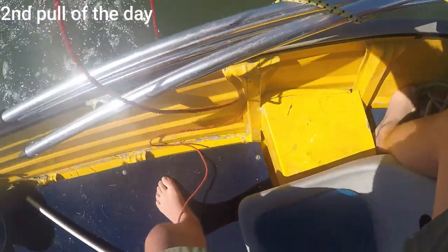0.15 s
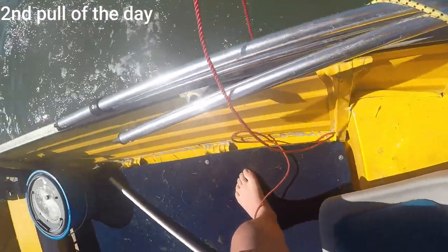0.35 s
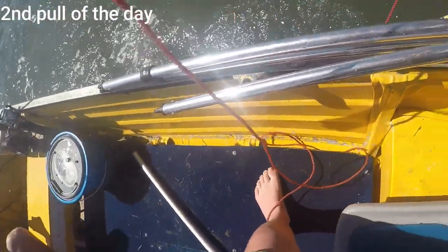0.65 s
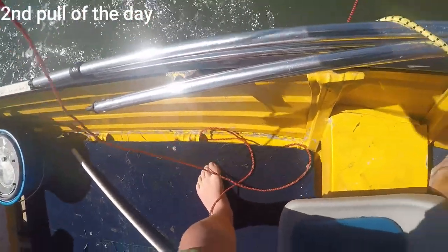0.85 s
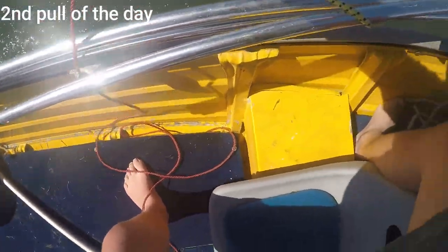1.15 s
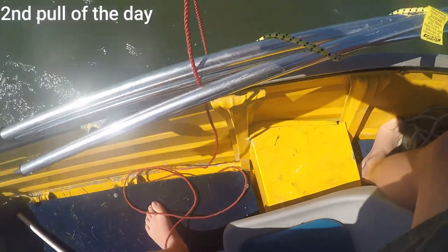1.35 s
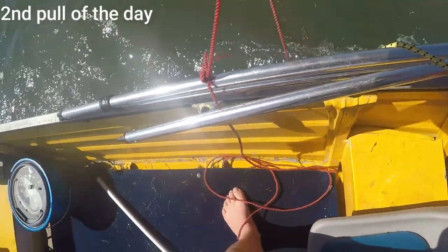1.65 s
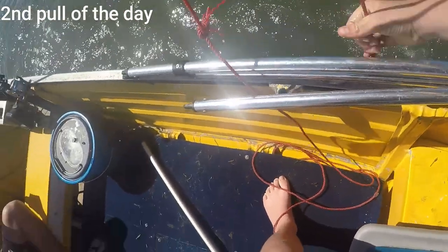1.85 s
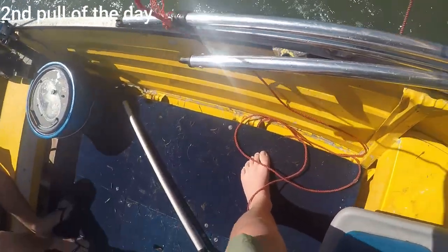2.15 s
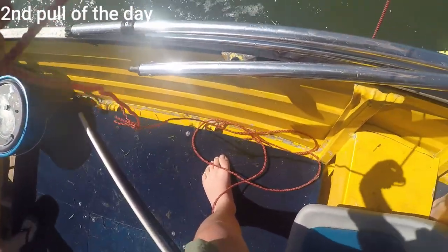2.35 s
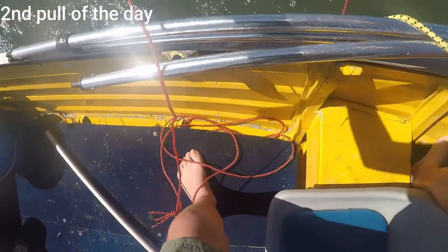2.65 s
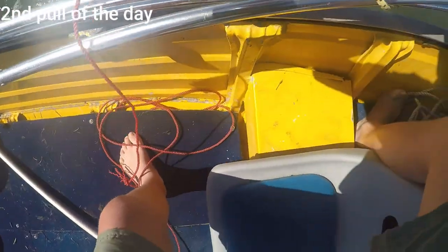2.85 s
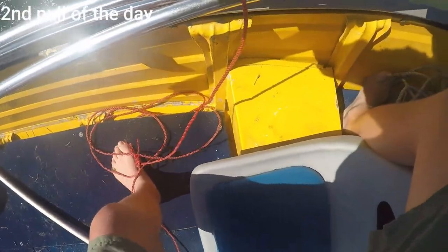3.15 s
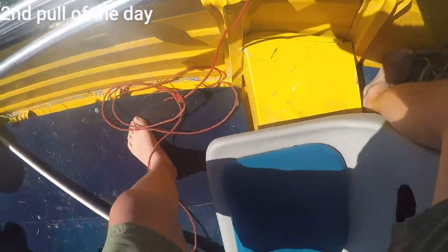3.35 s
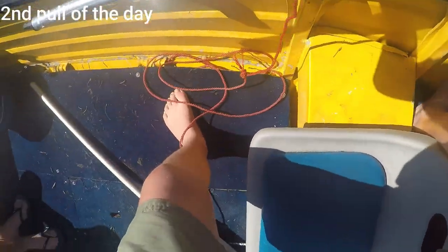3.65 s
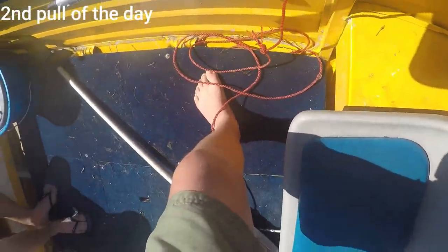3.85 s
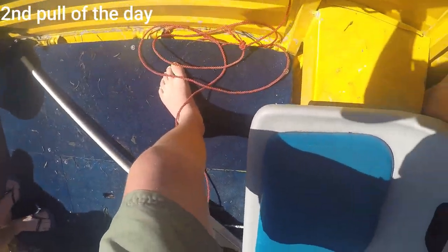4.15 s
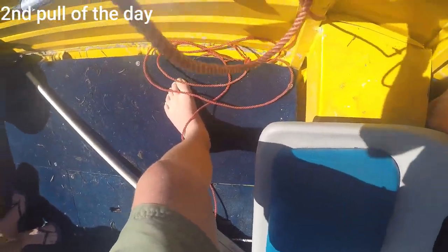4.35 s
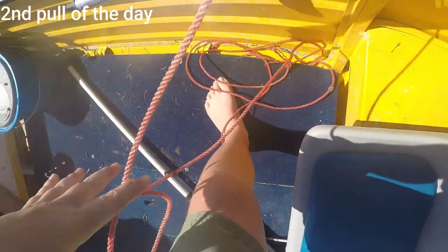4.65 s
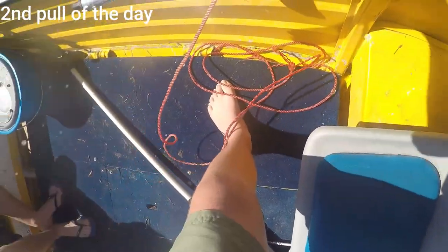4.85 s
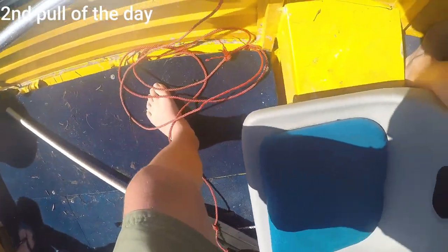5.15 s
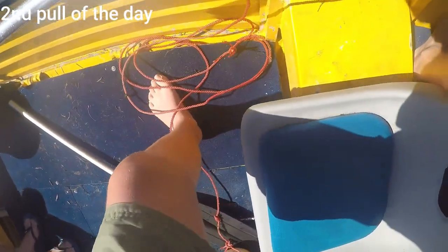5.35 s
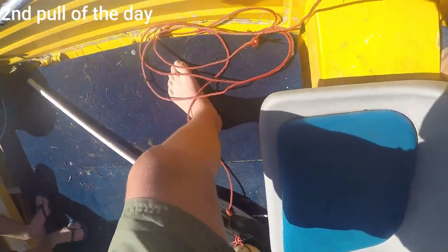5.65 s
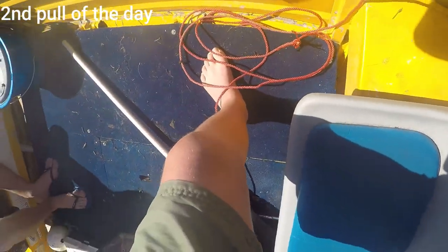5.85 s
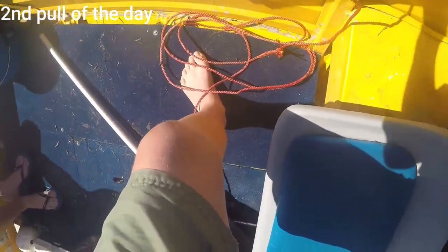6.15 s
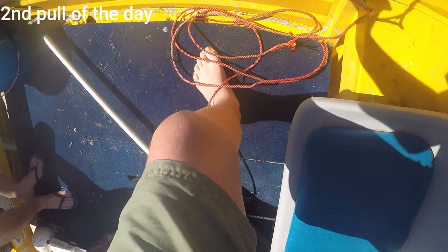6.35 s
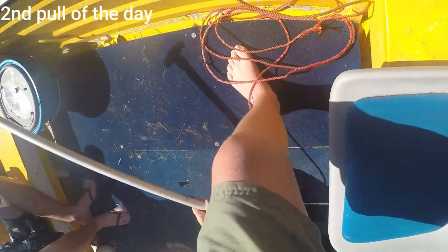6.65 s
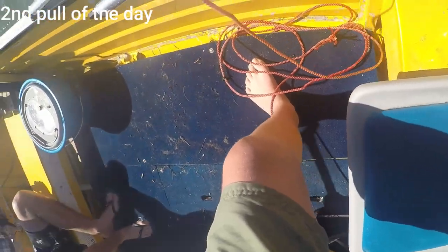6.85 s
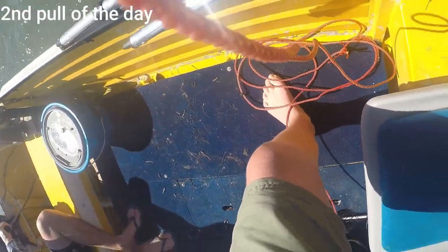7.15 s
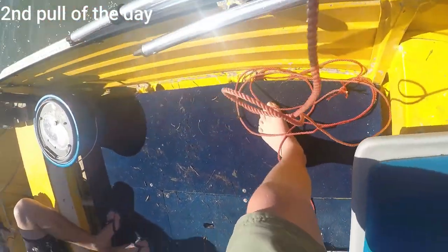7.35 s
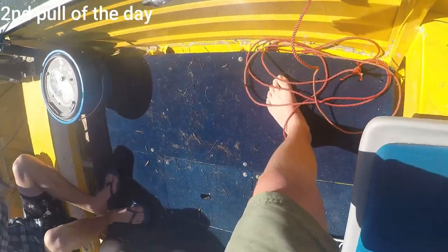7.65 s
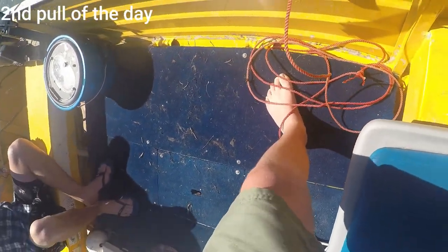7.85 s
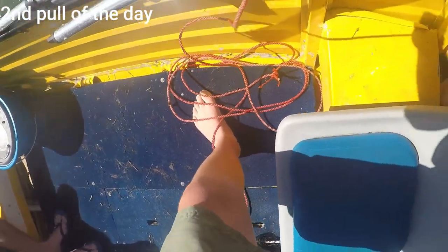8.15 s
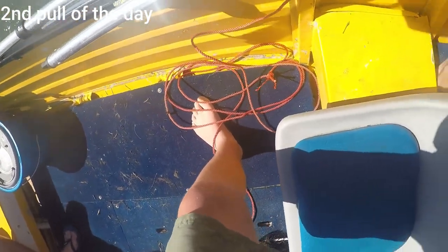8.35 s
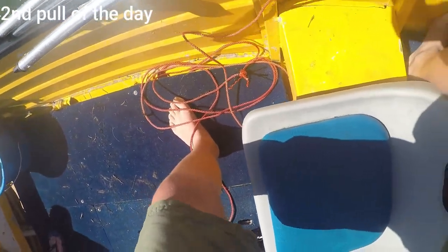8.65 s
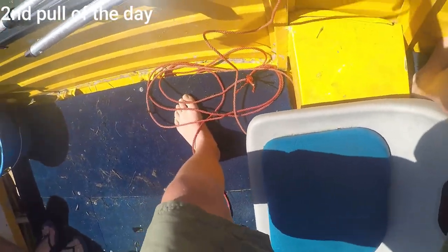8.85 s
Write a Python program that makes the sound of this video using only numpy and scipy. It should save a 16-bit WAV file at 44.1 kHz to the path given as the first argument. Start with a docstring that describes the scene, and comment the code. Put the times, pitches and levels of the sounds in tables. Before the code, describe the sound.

Outdoors in a small metal boat, heard from a body-worn microphone, wet rope is hauled in by repeated pulls, each a soft hiss with tiny splashes and a faint hull hum. Hard, short knocks on the microphone's case dominate early. A quieter middle brings dry scuffs in the hands; then knocks return, with a loud slap, rubbing and creaking as the rope hits the case. Low breeze rumble runs beneath.

```python
"""Rope hauled into a small boat

A rope is hauled hand over hand into a small aluminium boat, heard from a body-worn microphone.
Shaped noise and random clicks make the rope's hiss over the side, its scuffs in the hands and its rub on the case.
Damped modes make the knocks, slap and creak of the case and the tinkle of a small metal piece.
Slowly varying noise makes the breeze's rumble and the wash of the water."""
import sys
import numpy as np
from scipy import signal
from scipy.fft import rfft, irfft, next_fast_len
from scipy.io import wavfile
from scipy.ndimage import uniform_filter1d, minimum_filter1d

SR = 44100
rng = np.random.default_rng(int(sys.argv[2]) if len(sys.argv) > 2 else 0)


def store_wav(level_fs):
    """Save 16-bit WAV to argv[1]."""
    pcm = np.round(np.clip(np.atleast_2d(level_fs), -1, 1) * 32767)
    wavfile.write(sys.argv[1], SR, pcm.T.astype(np.int16))


N = 396459
TIME = np.arange(N) / SR
HIT = np.arange(int(.3 * SR)) / SR   # time axis of one short event, s

# lasting modes of the case: mode_hz, relative_level_db, t60_s
CASE_RING = [(1890, -19, .15), (2076, 6, 0.12), (2600, -3, 0.073), (4300, -20, .15), (4893, -4, 0.11)]


def from_db(db):
    """Decibels to gain."""
    return 10 ** (np.asarray(db) / 20)


def rms_one(x):
    """Scale to rms 1."""
    return x / np.sqrt(np.mean(x ** 2) + 1e-20)


def peak_one(x):
    """Scale to peak 1."""
    return x / np.abs(x).max()


def add(out, start_s, sound):
    """Mix a sound in at its start time."""
    i = max(int(start_s * SR), 0)
    out[i:i + len(sound)] += sound[:N - i]


def cut(x, hz, kind, order=2):
    """Butterworth low- or high-pass."""
    sos = signal.butter(order, min(hz, .45 * SR), kind, fs=SR, output="sos")
    return signal.sosfilt(sos, x)


def notch(x, hz, width_hz):
    """An antiresonance: the case hardly moves at this pitch."""
    b, a = signal.iirnotch(hz, hz / width_hz, fs=SR)
    return signal.lfilter(b, a, x)


def flutter(per_s, depth_db):
    """A gain that wanders between random values, per_s of them a second."""
    knots = rng.standard_normal(N // 10)
    return from_db(depth_db * np.interp(TIME * per_s, np.arange(len(knots)), knots))


def stroke(start_s, length_s, attack_s, release_s):
    """One movement: it eases in, holds until its length is up and dies away."""
    age = TIME - start_s
    rise = np.sin(np.pi / 2 * np.clip(age / attack_s, 0, 1)) ** 2
    return rise * np.exp(-np.clip((age - length_s) / release_s, 0, 20))


def puff(rise_s):
    """Envelope that peaks at 1 after rise_s and then dies away."""
    age = HIT / rise_s
    return age * np.exp(1 - age)


def colour(x, spectrum):
    """Give x a spectrum that falls away steeply past its ends; rms 1."""
    hz, db = np.transpose(spectrum)
    size = next_fast_len(N)
    octave = np.log2(np.fft.rfftfreq(size, 1 / SR) + 1)
    outside = np.abs(octave - np.clip(octave, np.log2(hz[0]), np.log2(hz[-1])))
    gain = from_db(np.interp(octave, np.log2(hz), db) - 20 * outside)   # 20 dB/octave outside
    return rms_one(irfft(rfft(x, size) * gain, size)[:N])


def noise(spectrum):
    """Smooth coloured noise, rms 1."""
    return colour(rng.standard_normal(N), spectrum)


def friction(spectrum, per_s, spread_db, smooth_db):
    """Fibres catch and let go in tiny clicks of uneven size, over a smooth rub."""
    heights = from_db(spread_db * np.minimum(rng.exponential(1, N), 4))
    sizes = heights * rng.choice([-1, 1], N)
    clicks = rms_one(sizes * (rng.random(N) < per_s / SR))
    return colour(clicks + from_db(smooth_db) * rng.standard_normal(N), spectrum)


def strike(modes, detune):
    """One blow rings every mode, with a strength and tuning that depend a little on where it lands."""
    hz, db, t60_s = np.transpose(modes)[:, :, None]
    level_chance, tuning_chance = rng.standard_normal((2, len(modes), 1))
    height = from_db(db + level_chance - 60 * HIT / t60_s)
    return np.sum(height * np.sin(2 * np.pi * hz * (1 + detune * tuning_chance) * HIT), axis=0)


def roughen(x, length_s, share):
    """A rough contact: the first touch is followed by a brief spray of smaller ones."""
    age = HIT[:SR // 50] / length_s
    touches = rng.standard_normal(len(age)) * age * np.exp(-age)
    touches *= share / np.linalg.norm(touches)
    touches[0] += 1
    return signal.fftconvolve(x, touches)[:len(x)]


def disperse(x, hz, count):
    """Bending waves carry the treble faster than the lows: a chain of allpasses."""
    k = np.tan(np.pi * hz / SR)
    a = (k - 1) / (k + 1)
    return signal.sosfilt([[a, 1, 0, 1, a, 0]] * count, x)


def air():
    """Open air: faint white noise."""
    return from_db(-83) * rng.standard_normal(N)


def breeze(hull):
    """Gusts and the swing of each pull buffet the microphone; slow eddies rumble underneath."""
    # breeze strength: time_s, strength_db
    wind = [(0.0, -36), (0.37, -37.5), (0.82, -50.5), (1.35, -43.5), (1.58, -34), (2.05, -55), (2.38, -54),
            (2.8, -45), (2.98, -41), (3.53, -43), (3.78, -53.5), (3.98, -54.5), (4.28, -49), (4.66, -56.5),
            (5.31, -54), (5.53, -50.5), (6.21, -52.5), (6.36, -58), (6.61, -52), (6.79, -47), (7.18, -49.5),
            (7.41, -57.5), (7.79, -59), (8.06, -50), (8.79, -57.5), (8.99, -51.5)]
    # slow eddies: freq_hz, relative_density_db_per_hz
    rumble_spectrum = [(15, -6.5), (28, -2.5), (45, -2), (65, -8), (100, -25), (200, -38)]
    # buffeting: freq_hz, relative_density_db_per_hz
    buffet_spectrum = [(50, -24), (85, 0), (115, 1), (160, -8), (220, -21), (350, -27), (600, -36)]
    usual_wind_db, rumble_db, buffet_db = -49.5, -38, -48.5   # last two: in a breeze of the usual strength
    rumble_growth = 0.71   # dB per dB: rumble grows more slowly than buffeting
    sway_db = 3.5   # buffeting by each pull's swing, relative to the hull gain
    time_s, strength_db = np.transpose(wind)
    gust = from_db(np.interp(TIME, time_s, strength_db) - usual_wind_db)
    buffet = np.hypot(from_db(buffet_db) * gust, from_db(sway_db) * hull)
    slow = noise(rumble_spectrum) * flutter(per_s=9, depth_db=2.5)
    fast = noise(buffet_spectrum) * flutter(per_s=14, depth_db=2.0)
    return from_db(rumble_db) * gust ** rumble_growth * slow + buffet * fast


def tinks():
    """A small metal piece clicks and rings on one high note."""
    # contacts: start_s, relative_level_db
    contacts = [(0.3184, -56), (1.0465, -52), (1.6444, -54), (2.6853, -47.5), (2.7375, -42.5), (4.174, -56),
                (4.844, -49.5), (6.537, -48), (7.5018, -43), (8.3659, -53), (8.3994, -32)]
    # modes of the click: mode_hz, relative_level_db, t60_s
    click_modes = [(1950, -5, 0.047), (3660, 9.5, 0.013), (5260, -5, 0.011), (7500, 6, 0.033),
                   (8070, -2.5, 0.025), (10900, -24, .012), (13400, -22, 0.0057)]
    note_hz, note_t60_s = 7340, 0.15
    note_db, note_growth = -25, 0.74   # note at a 0 dB contact; its rise, dB per dB
    out = np.zeros(N)
    note = np.sin(2 * np.pi * note_hz * HIT) * from_db(-60 * HIT / note_t60_s)
    for start_s, db in contacts:
        click = roughen(strike(click_modes, detune=0.017), length_s=0.0013, share=1.0)
        click = peak_one(disperse(click, 5340, count=6))
        add(out, start_s, from_db(db - 0.5) * click + from_db(note_db + note_growth * db) * note)
    return out


def groans():
    """The case groans briefly as it shifts on its mount: an unsteady tone with a weak octave."""
    # groans: start_s, length_s, pitch_hz, level_db
    shifts = [(0.017, 0.014, 856, -36), (7.904, 0.03, 833, -39.5)]
    out = np.zeros(N)
    for start_s, length_s, hz, db in shifts:
        t = HIT[HIT < length_s]
        cycles = np.cumsum(hz * (1 + 0.47 * rng.standard_normal(len(t)))) / SR
        wave = np.sin(2 * np.pi * cycles) + 0.085 * np.sin(4 * np.pi * cycles)
        swell = np.sqrt(np.abs(np.sin(np.pi * t / length_s)))
        add(out, start_s, from_db(db) * swell * wave)
    return out


def knocks():
    """Each knock rings the damped case, cracks in its walls and rocks it on its mount."""
    # blows: start_s, relative_level_db, contact_hardness_db, relative_thump_db, thump_hz
    blows = [(0.014, -30, -11, -35, 126), (0.365, -10, 1, -24, 47.3), (0.511, -13.5, 1.5, -29, 51),
             (0.786, -24, 2, -31, 75), (1.707, -13.5, 1, -26, 55.3), (1.933, -42, 7, -45.5, 51),
             (2.914, -15.5, 1.5, -25.5, 102), (5.704, -25, -17, -48, 49), (5.966, -51, 0, -40.5, 45.6),
             (6.809, -12, -1, -25, 47.4), (7.011, -24, -1, -33, 45), (7.161, -17, 5.5, -22.5, 33.2),
             (7.889, -40, 11, -47, 38), (7.926, -27, -20, -31, 117), (7.999, -10, 1, -21.5, 103),
             (8.229, -34.5, 5, -40.5, 107), (8.785, -31, -6, -38.5, 101.4)]
    # damped body modes: mode_hz, relative_level_db, t60_s
    body_modes = [(245, -8, 0.009), (309, -12, 0.029), (520.5, -23, 0.12), (730, 0.5, 0.019),
                  (867, -0.5, 0.013), (1287, -2, 0.005), (1610, -10, 0.011), (1920, -10.5, 0.015)]
    # wall modes: mode_hz, relative_level_db, t60_s
    crack_modes = [(3340, 5, 0.012), (3703, -1, 0.013), (5420, -3, 0.0052), (6100, -38, 0.0056),
                   (7870, -17, 0.015), (13000, -30, .004)]
    crack_db, crack_growth = -10.5, 1.43   # crack at 0 dB level and hardness; its rise, dB per dB
    out = np.zeros(N)
    ring = peak_one(strike(CASE_RING, detune=.001))
    for start_s, db, hard_db, thump_db, thump_hz in blows:
        contact_hz = 3000 * 2 ** ((db + hard_db) / 45)   # gentler and softer knocks are duller
        body = notch(cut(strike(body_modes, detune=0.018), contact_hz, "low"), hz=404, width_hz=136)
        body = roughen(body, length_s=0.0019, share=0.39)
        body = peak_one(disperse(body, 1340, count=3))

        crack = cut(strike(crack_modes, detune=0.025), 2800, "high", order=4)
        crack = roughen(crack, length_s=0.00086, share=0.92)
        crack = peak_one(disperse(crack, 4500, count=4))
        crack_gain = from_db(crack_db + crack_growth * db + hard_db)

        # the mount is stiff while pressed in, then settles to its own pitch
        swing_hz = thump_hz + (100 - thump_hz) * np.exp(-HIT / 0.0028)
        decay = from_db(-60 * HIT * thump_hz / 5.73)   # t60 of 5.73 cycles
        thump = -np.sin(2 * np.pi * np.cumsum(swing_hz) / SR) * decay
        # a quicker swing packs its energy into less time
        thump = np.sqrt(thump_hz / 50) * cut(thump, 185, "low")

        knock = from_db(db + 3.5) * (body + from_db(-36.0) * ring) + crack_gain * crack
        add(out, start_s + 0.00096, knock + from_db(thump_db + 11.5) * thump)
    return out


def hauling():
    """Gains of the rope's hiss and the hull's hum: the pulls add in power to the calm wash."""
    # pulls over the side: start_s, length_s, hiss_db, relative_hull_db
    pulls = [(-0.1, 0.33, -54.5, -56), (0.26, 0.24, -59, -53.5), (0.603, 0.44, -58, -60),
             (1.044, 0.15, -54.5, -56.5), (1.285, 0.44, -59.5, -58), (1.757, 0.35, -69.5, -66.5),
             (2.117, 0.12, -63, -73), (2.403, 0.47, -69, -64), (2.754, 0.25, -56.5, -56.5),
             (3.027, 0.7, -64, -61.5), (3.737, 0.38, -69, -69), (4.076, 0.43, -66.5, -67.5),
             (4.95, 0.18, -67.5, -63), (5.192, 0.7, -69.5, -68.5), (5.907, 0.34, -65.5, -64.5),
             (6.365, 0.22, -63.5, -64), (6.593, 0.17, -59, -59), (6.89, 0.26, -65, -65),
             (8.05, 0.33, -68.5, -66.5), (8.454, 0.63, -73, -62.5)]
    calm_hiss_db, calm_hull_db = -71.5, -70.5   # between pulls
    hiss_power, hull_power = from_db(calm_hiss_db) ** 2, from_db(calm_hull_db) ** 2
    for start_s, length_s, hiss_db, hull_db in pulls:
        pull = stroke(start_s, length_s, attack_s=0.085, release_s=0.13)
        hiss_power = hiss_power + (from_db(hiss_db) * pull) ** 2
        hull_power = hull_power + (from_db(hull_db) * pull) ** 2
    hiss_over_calm = np.sqrt(hiss_power) / from_db(calm_hiss_db)
    return np.sqrt(hiss_power), np.sqrt(hull_power), hiss_over_calm


def splashes():
    """Small splashes off the wet rope: swishes at random times, each in a band of its own."""
    per_s, level_db = 9, -2   # level relative to the hiss, scaled by each splash's random size
    out = np.zeros(N)
    envelope = puff(rise_s=0.025)
    for when, pitch, size in rng.random((int(per_s * N / SR), 3)):
        low_hz = 600 * 2 ** (2.5 * pitch)
        swish = cut(rng.standard_normal(len(HIT)), low_hz, "high")
        swish = rms_one(cut(swish, 1.4 * low_hz, "low", order=4))
        add(out, when * N / SR, size * swish * envelope)
    return from_db(level_db) * out


def rope_over_side(hiss, hull, hiss_over_calm):
    """Wet rope hisses over the gunwale, splashes, sheds a fine spray and sets the hull humming with the wash."""
    # rope hiss: freq_hz, relative_density_db_per_hz
    hiss_spectrum = [(700, 1), (1000, -6.5), (1220, 0.5), (1490, -5), (1850, 4.5), (2200, -2.5), (2430, 2),
                     (2800, -5), (3250, 0.5), (3500, -1.5), (3720, 1), (4150, -13.5), (6000, -22.5)]
    # fine spray: freq_hz, relative_density_db_per_hz
    spray_spectrum = [(4000, -0.5), (4900, 0.5), (5550, 1), (6300, -4.5), (7150, -1.5), (7900, -8),
                      (8500, -5.5), (9400, -15.5), (10600, -18.5), (11300, -9.5), (12000, -19),
                      (13400, -13), (15300, -21)]
    # hull hum: freq_hz, relative_density_db_per_hz
    hull_spectrum = [(200, 4.5), (330, -1.5), (420, -6), (540, -2), (650, -4), (780, -2.5), (1050, -12),
                     (1600, -18)]
    calm_spray_db, spray_growth = -82, 0.8   # spray between pulls; its rise, dB per dB of hiss
    spray = from_db(calm_spray_db) * hiss_over_calm ** spray_growth
    tug = flutter(per_s=18, depth_db=1.1)
    fibres = friction(hiss_spectrum, per_s=2700, spread_db=4.0, smooth_db=-1.5)
    drops = friction(spray_spectrum, per_s=1100, spread_db=7.0, smooth_db=3.0)
    hum = from_db(3.0) * hull * noise(hull_spectrum)
    return hiss * (tug * fibres + splashes()) + tug * spray * drops + hum


def rope_through_grip():
    """The rope runs through the palm and each strand of its lay ticks past the fingers."""
    # runs: start_s, length_s, level_db
    runs = [(8.621, 0.096, -54.5), (8.72, 0.14, -55.5), (8.9, 0.058, -54)]
    # rub on the palm: freq_hz, relative_density_db_per_hz
    palm_spectrum = [(710, -47), (1200, -3.5), (1900, -8.5), (2050, -8), (2480, -3.5), (3050, -13),
                     (3650, 4.5), (4110, -10), (5300, -12.5), (8510, -20.5), (10400, -35), (13200, -26),
                     (15500, -38)]
    strands_per_s = 100
    since_tick = strands_per_s * TIME % 1   # in strands
    ticking = rms_one(1 + 1.05 * flutter(per_s=79, depth_db=4.5) * np.exp(-since_tick / 0.15))
    grips = [from_db(db) * stroke(start_s, length_s, attack_s=0.0078, release_s=.06)
             for start_s, length_s, db in runs]
    rub = friction(palm_spectrum, per_s=1500, spread_db=0.5, smooth_db=3.0)
    return np.max(grips, axis=0) * ticking * rub


def scuffs():
    """Brief scuffs of rope in the hands as the grip changes: puffs of friction."""
    # grip changes: start_s, relative_level_db
    grip_changes = [(3.148, -56), (5.064, -48.5), (5.387, -55.5), (5.505, -45.5), (5.5234, -53),
                    (5.5402, -44), (5.566, -42), (5.591, -41.5), (5.627, -49.5), (5.668, -52),
                    (5.744, -56.5), (5.772, -56), (6.488, -52), (6.94, -55), (7.174, -41.5),
                    (7.6503, -54.5), (8.136, -47.5), (8.248, -54.5)]
    # scuffing: freq_hz, relative_density_db_per_hz
    scuff_spectrum = [(530, -44), (900, -17), (1090, -16), (1290, 2.5), (1400, -10.5), (1860, 1),
                      (2250, -16.5), (3380, 3), (4080, -6.5), (6200, -14.5), (7060, -10), (11600, -27.5),
                      (15500, -27)]
    pressure = np.zeros(N)
    envelope = puff(rise_s=0.00675)
    for start_s, db in grip_changes:
        add(pressure, start_s - .002, from_db(db - 5) * envelope)
    return pressure * friction(scuff_spectrum, per_s=1400, spread_db=2.5, smooth_db=-1.5)


def rope_dragging():
    """The rope rubs across the case and shakes it; the pressure sags during each drag."""
    # drags: start_s, length_s, rub_db, shake_db (levels before the sag)
    drags = [(7.134, 0.06, -48, -31.5), (7.193, 0.094, -42.5, -31), (7.271, 0.083, -25.5, -25),
             (7.893, 0.16, -49.5, -38)]
    # rub on the case: freq_hz, relative_density_db_per_hz
    rub_spectrum = [(290, -16.5), (500, -9), (863, -11), (1270, -4.5), (1990, -6.5), (2500, -5.5),
                    (2800, -7), (4700, -18), (4980, -24), (5510, -18), (6270, -24.5), (13000, -36),
                    (15500, -26)]
    # case shaking on its mount: freq_hz, relative_density_db_per_hz
    shake_spectrum = [(20, 1.5), (50, -13.5), (110, -7), (200, -19)]
    sag_db_per_s = 124
    rub, shake = np.zeros(N), np.zeros(N)
    for start_s, length_s, rub_db, shake_db in drags:
        sag = from_db(-sag_db_per_s * np.clip(TIME - start_s, 0, length_s))
        pressure = sag * stroke(start_s, length_s, attack_s=.025, release_s=0.0075)
        rub += from_db(rub_db) * pressure
        shake += from_db(shake_db) * pressure
    fibres = friction(rub_spectrum, per_s=2700, spread_db=2.5, smooth_db=-7)
    return rub * fibres + shake * noise(shake_spectrum)


def rope_on_case():
    """The rope slaps the case, then its lay catches and slips strand by strand; the case rings on faintly."""
    # the one slap: start_s, level_db
    slap_start_s, slap_db = (7.2226, 2.5)
    # slips: start_s, level_db
    slips = [(7.2775, -14), (7.3053, -6.5), (7.3167, -13.5), (7.3250, -24), (7.3285, -13), (7.3397, -12),
             (7.3497, -12.5), (7.3586, -7)]
    # case modes under the slap: mode_hz, relative_level_db, t60_s
    slap_modes = [(710, 0, 0.0053), (1290, -1, 0.0088), (1790, -6, 0.012), (1950, -5, 0.011),
                  (3140, -2, 0.003), (3880, -5, 0.0059), (5300, -21, 0.012), (8300, -28, 0.0033),
                  (13000, -19, .003)]
    # case modes under the slips: mode_hz, relative_level_db, t60_s
    creak_modes = [(1380, -5, 0.015), (1970, -4.5, 0.023), (2450, -7.5, 0.018), (2820, 3, 0.013),
                   (3000, -1.5, 0.011), (3310, 1.5, 0.01), (3680, -22, .012), (5180, -11.5, 0.015),
                   (6260, -30.5, 0.017), (8000, -48, .006), (12800, -11, .0015)]
    out = np.zeros(N)
    ring = peak_one(strike(CASE_RING, detune=.001))
    slap = cut(strike(slap_modes, detune=0.011), 7000, "low")
    slap = peak_one(disperse(slap, 3000, count=6))
    add(out, slap_start_s, from_db(slap_db) * (slap + from_db(-38.5) * ring))
    for start_s, db in slips:
        slip = roughen(strike(creak_modes, detune=.004), length_s=.0005, share=0.61)
        slip = peak_one(disperse(cut(slip, 920, "high"), 3400, count=16))
        add(out, start_s - .0003, from_db(db) * (slip + from_db(-26.5) * ring))
    return out


def scene():
    """All sources over a faint hiss of open air."""
    hiss, hull, hiss_over_calm = hauling()
    background = air() + breeze(hull) + tinks()
    case = groans() + knocks()
    hands = rope_through_grip() + scuffs()
    rope = rope_over_side(hiss, hull, hiss_over_calm) + hands + rope_dragging() + rope_on_case()
    return (background + case + rope)[None]


def record(dry):
    """A fast limiter holds the loudest peaks, the microphone dulls the highest treble and the top is cut."""
    ceiling, window = .32, 25   # full scale = 1; samples
    needed = ceiling / np.maximum(np.abs(dry), ceiling)
    gain = uniform_filter1d(minimum_filter1d(needed, size=window), size=window)
    dulled = cut(dry * gain, 14000, "low", order=4)
    top_cut = signal.ellip(10, .1, 80, 15600, fs=SR, output="sos")
    return signal.sosfilt(top_cut, dulled)


dry = scene()
out = record(dry)
store_wav(out)
```